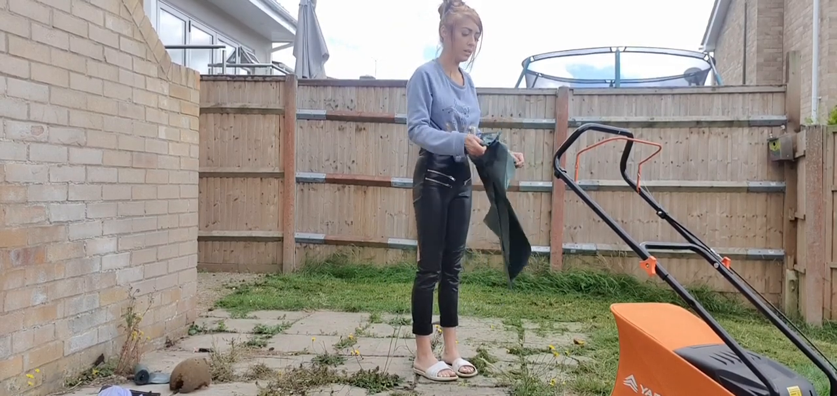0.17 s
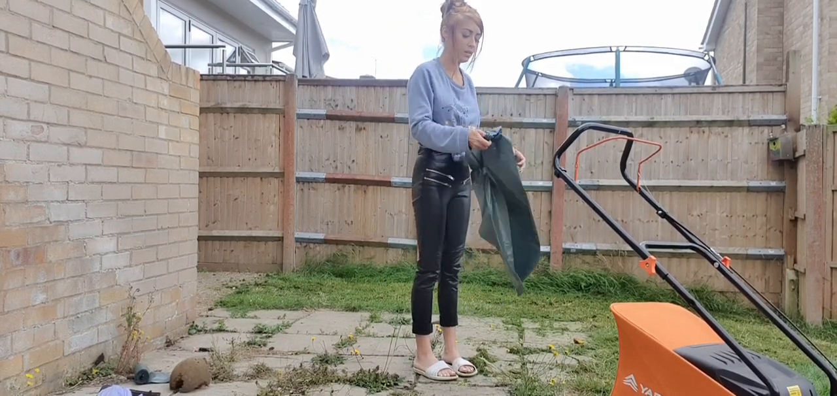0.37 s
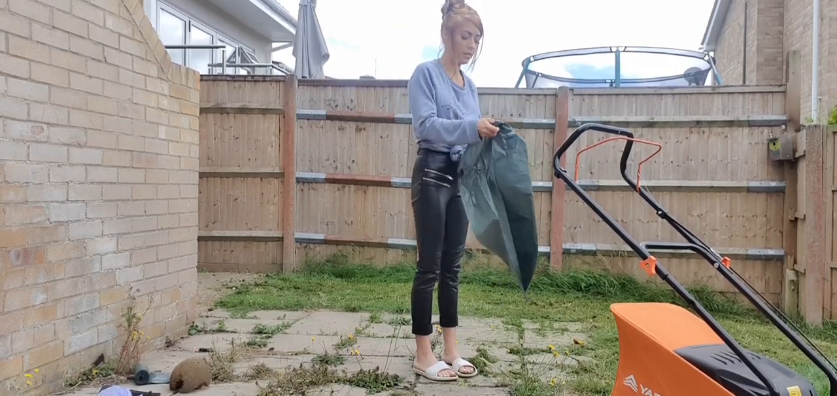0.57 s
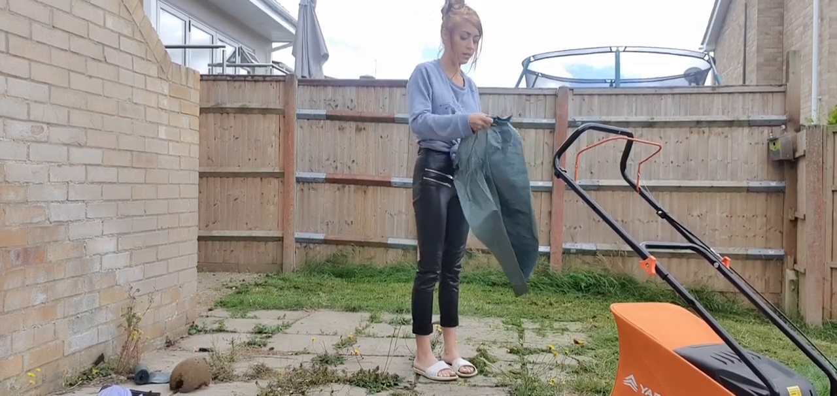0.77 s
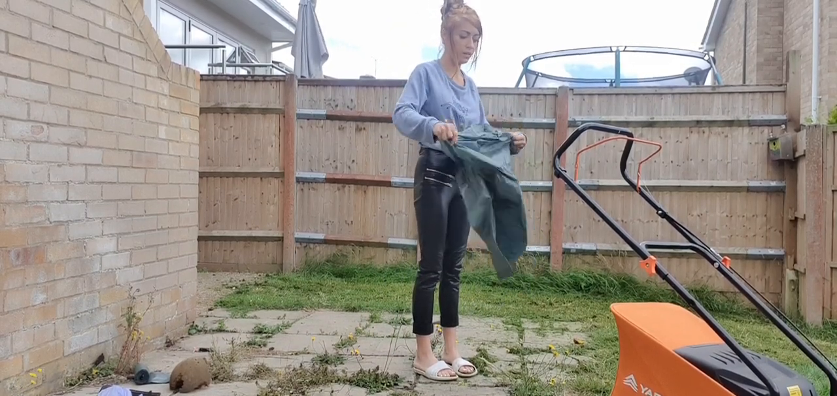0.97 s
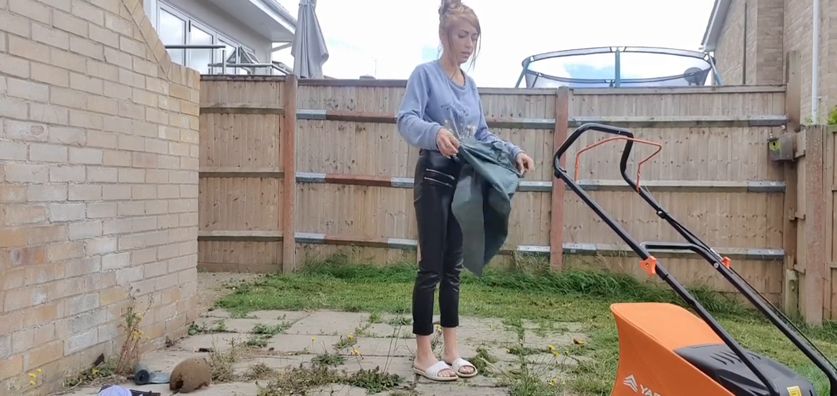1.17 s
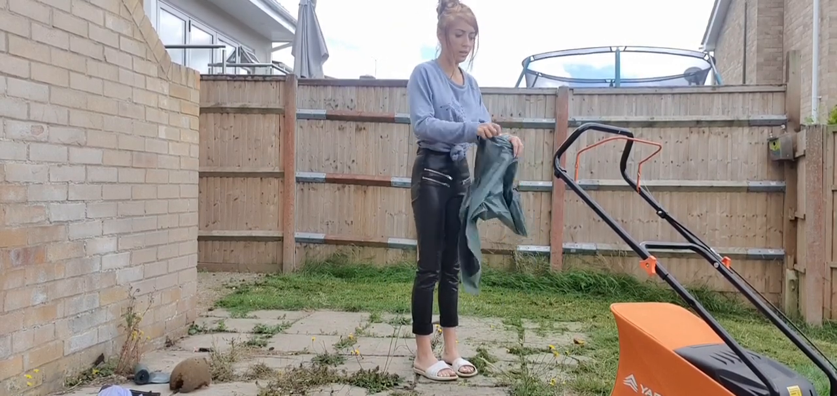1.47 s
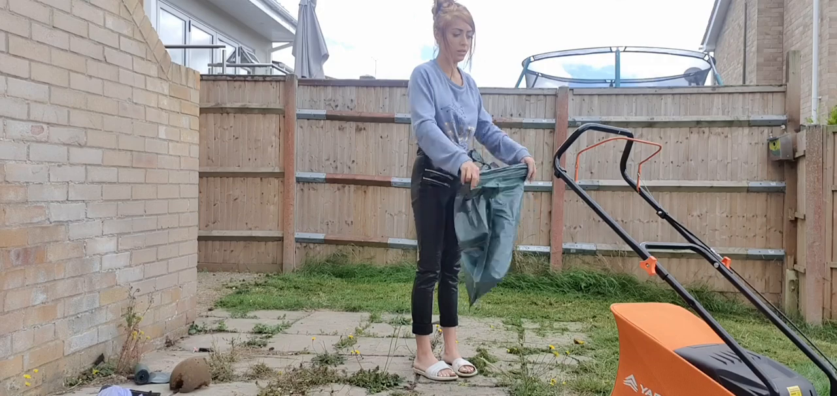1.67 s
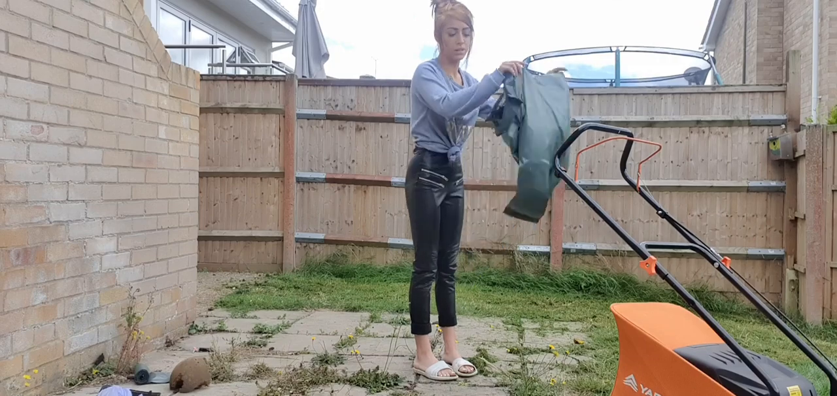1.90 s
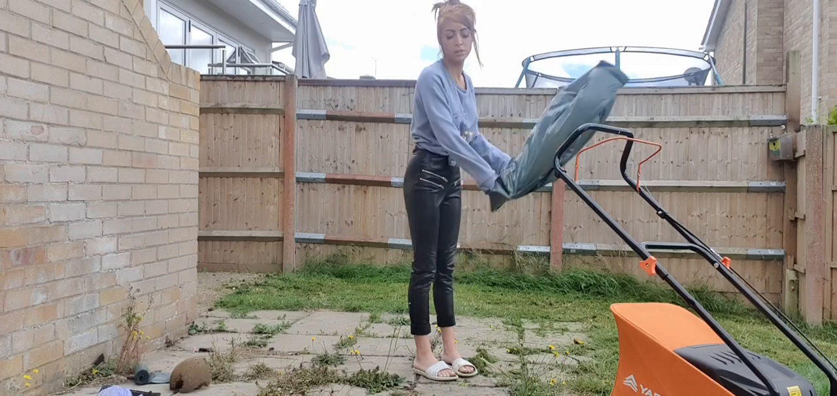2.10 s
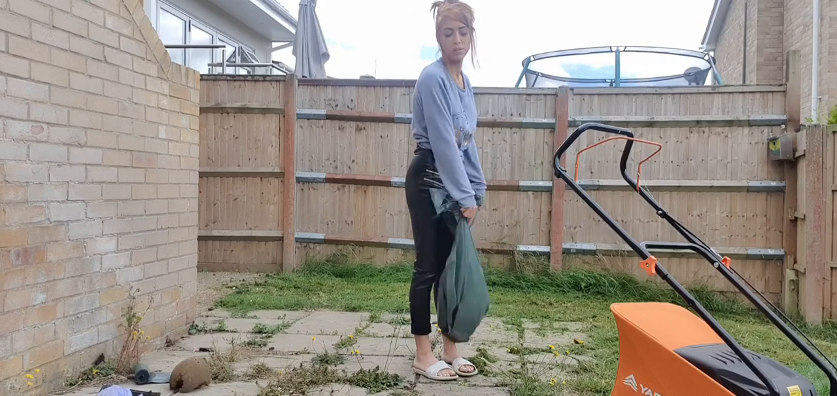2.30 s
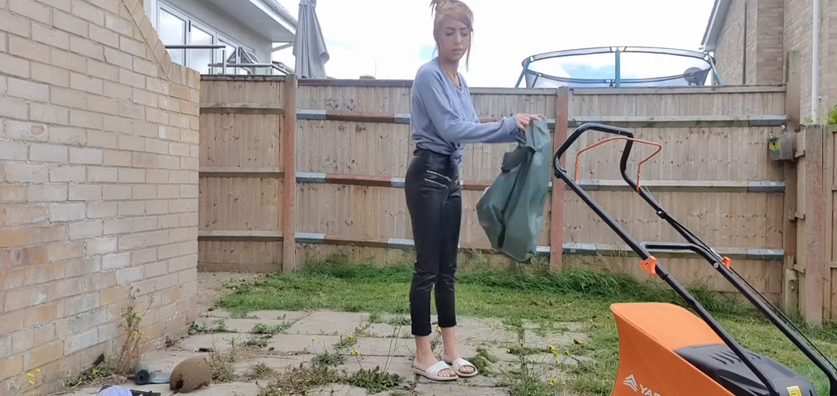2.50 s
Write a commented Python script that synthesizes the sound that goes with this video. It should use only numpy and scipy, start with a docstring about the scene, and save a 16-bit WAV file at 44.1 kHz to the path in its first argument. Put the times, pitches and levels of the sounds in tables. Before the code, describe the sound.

A stiff fabric bag rustles faintly with small crinkly clicks from 0 s, strongest near 0.1 s, then nearly stops around 0.7 s. A fuller rustle with a sharp fold flick comes near 1.05 s. Steadier brushing runs from 1.5 to 2.1 s, swelling into a loud, hollow snap at 2.19 s. Coarse rustling and dull flaps follow, with a flick at 2.5 s, fading. Short yard echoes, faint low outdoor rumble.

```python
"""A stiff fabric grass bag is picked open by hand in a small walled yard, unfolded, swung up and shaken out.
Sliding weave rustles as noise and its creases buckle in tiny clicks, with whisks and folds flicking over;
loose panels flap in dull slaps. At about 2.19 s the cloth pulls taut in one loud snap, then settles.
Throughout, brick wall and fence return quick echoes and a scattered tail over a faint outdoor rumble.
"""
import sys
import numpy as np
from scipy import signal
from scipy.fft import rfft, irfft, next_fast_len
from scipy.io import wavfile
from scipy.ndimage import uniform_filter1d

SR = 44100
rng = np.random.default_rng(int(sys.argv[2]) if len(sys.argv) > 2 else 0)


def inscribe(sig):
    """Save sig as 16-bit PCM at rate SR to the path in sys.argv[1].

    A 1-D sig is mono; a 2-D sig holds one channel per row.
    Samples are clipped to [-1, 1] before scaling.
    """
    pcm = np.round(np.clip(np.atleast_2d(sig).T, -1, 1) * 32767)
    wavfile.write(sys.argv[1], SR, pcm.astype(np.int16))


N = 116865  # samples, 2.65 s
T = np.arange(N) / SR  # s
SIZE = next_fast_len(N + SR)  # transform length with room for filter tails
HZ = np.maximum(np.arange(SIZE // 2 + 1) * SR / SIZE, 1)


def undb(db):
    """Decibels are logarithmic: 20 dB is a tenfold gain in amplitude."""
    return 10 ** (np.asarray(db) / 20)


def unit(x):
    """Normalisation: scale to an rms of 1."""
    return x / np.sqrt(np.mean(x ** 2))


def curve(rows, t):
    """Linear interpolation in time through (s, value) rows."""
    return np.interp(t, *np.array(rows).T)


def across(points):
    """Linear interpolation through (Hz, value) points on a logarithmic frequency axis."""
    hz, value = np.array(points).T
    return np.interp(np.log(HZ), np.log(hz), value)


def shape(x, db):
    """Minimum-phase filtering: a folded cepstrum gives a causal filter; white input keeps its level."""
    gain = undb(db)
    cepstrum = irfft(np.log(gain / np.sqrt(np.mean(gain ** 2))), SIZE)
    cepstrum[1:SIZE // 2] *= 2
    cepstrum[SIZE // 2 + 1:] = 0
    response = np.exp(rfft(cepstrum))
    return irfft(rfft(x, SIZE) * response, SIZE)[..., :N]


def walk(rate):
    """Smoothed random modulation: about `rate` new values per second, rms 1."""
    hold = int(SR / rate)
    steps = rng.standard_normal(N)[:N // hold + 1]
    return unit(uniform_filter1d(np.repeat(steps, hold), hold))[:N]


def clicks(per_s, spread_db):
    """Random impulse train, rms 1: positive spread makes a few clicks strong, negative a few weak."""
    size = undb(spread_db * np.minimum(rng.exponential(size=N), 5))
    struck = rng.random(N) < per_s / SR
    return unit(struck * size * rng.choice([-1, 1], N))


def swell(at, rise, fall):
    """Exponential envelope: growth to a peak of 1, then decay (all times in seconds)."""
    return np.exp(-np.maximum((at - T) / rise, (T - at) / fall))


# Rubbing effort of the hands, one curve per movement. Each row: time in seconds, level in dB.
PICK_OPEN_EFFORT = [(0.0, -51), (0.124, -36.5), (0.166, -47.5), (0.28, -50.5), (0.312, -67), (0.356, -54),
                    (0.502, -60), (0.506, -54), (0.608, -50.5), (0.658, -61), (0.7, -65)]
UNFOLD_EFFORT = [(0.73, -52), (0.738, -50), (0.814, -57), (0.858, -46.5), (0.942, -44.5), (0.948, -38),
                 (1.074, -35), (1.164, -51), (1.25, -51), (1.274, -47), (1.308, -53.5), (1.35, -45.5),
                 (1.424, -54.5), (1.432, -59), (1.45, -61)]
LIFT_EFFORT = [(1.48, -45), (1.502, -62), (1.516, -42.5), (1.688, -38.5), (1.828, -44), (1.864, -36),
               (1.926, -40), (1.95, -37.5), (2.08, -45.5)]
SHAKE_EFFORT = [(2.1, -40), (2.178, -28)]
SETTLE_EFFORT = [(2.25, -30.5), (2.368, -35.5), (2.402, -30.5), (2.456, -37), (2.524, -37.5),
                 (2.598, -48.5), (2.606, -39.5), (2.638, -55), (2.65, -45)]
# Single folds that flick over. Each row: time in seconds, level in dB.
FOLD_FLICKS = [(.041, -42), (.118, -33), (0.507, -45), (0.859, -40), (.949, -35), (.956, -39),
               (1.0632, -27), (1.275, -43), (1.474, -40), (1.5135, -45), (1.6175, -35), (1.8417, -36.5),
               (2.129, -45), (2.513, -28), (2.6068, -40)]
# Relative spectrum of rubbing cloth. Each row: frequency in Hz, density in dB per Hz.
RUB_SPECTRUM = [(60, -18.5), (170, -3.5), (300, -7.5), (700, -4.5), (1100, -3.5), (2300, -1.5), (3600, 0),
                (5000, -1.5), (6200, -7), (7100, -18.5), (7900, -22.5), (9500, -16.5), (11300, -15.5),
                (15500, -20.5)]
# Changing sheen of the rubbing. Each row: time in seconds, level of the treble in dB.
SHEEN_LEVEL = [(0, 1), (.3, -0.5), (.7, -1), (.92, -2), (.97, -3.5), (1.1, 0), (1.2, 0), (1.5, 3), (1.8, 3),
               (1.98, -2), (2.07, -1), (2.3, -3.5), (2.42, -1.5), (2.65, -5.5)]
SHEEN_HZ = 6940  # the treble lies above this
SLIDE_DB, CRINKLE_DB = 1, -2.5  # shares of smooth sliding and buckling creases
CRINKLE_PER_S, CRINKLE_SPREAD_DB = 1400, 2.5
RUB_FLUTTER_DB = 1.27  # rms


def rustle():
    """Friction and buckling: sliding weave gives noise, creases give clicks, folds give click bursts."""
    movements = PICK_OPEN_EFFORT + UNFOLD_EFFORT + LIFT_EFFORT + SHAKE_EFFORT + SETTLE_EFFORT
    effort = undb(curve(movements, T) + RUB_FLUTTER_DB * walk(rate=110))
    slide = undb(SLIDE_DB) * rng.standard_normal(N)
    crinkle = undb(CRINKLE_DB) * clicks(CRINKLE_PER_S, CRINKLE_SPREAD_DB)
    flicks = sum(undb(db) * swell(at, rise=0.0004, fall=0.0042) for at, db in FOLD_FLICKS)
    folds = flicks * clicks(per_s=8500, spread_db=1.5)
    cloth = shape(effort * (slide + crinkle) + folds, across(RUB_SPECTRUM))
    treble = irfft(rfft(cloth, SIZE) / (1 + (SHEEN_HZ / HZ) ** 4), SIZE)[:N]
    return cloth + (undb(curve(SHEEN_LEVEL, T)) - 1) * treble


# The cloth pulls taut. Each row: peak time in seconds, rise in seconds, fall in seconds, level in dB.
TAUT_PULLS = [(2.1845, 0.0037, 0.0052, -18.5), (2.1939, .002, .0022, -7), (2.204, 0.0026, 0.016, -24.5)]
# Relative spectrum of the snap. Each row: frequency in Hz, density in dB per Hz.
SNAP_SPECTRUM = [(60, -7), (170, -17), (500, -2.5), (1000, 0), (2000, 3), (2800, -5), (3800, -0.5),
                 (5000, -8.5), (6200, -11.5), (7700, -25.5), (10000, -21), (15500, -40)]


def snap():
    """Impulsive release: creases pull straight almost together, as a dense burst of clicks."""
    tension = sum(undb(db) * swell(at, rise, fall) for at, rise, fall, db in TAUT_PULLS)
    return shape(tension * clicks(per_s=15000, spread_db=1), across(SNAP_SPECTRUM) + hollow())


# Loose panels that billow. Each row: fullest moment in seconds, rise in seconds, fall in seconds, level in dB.
PANEL_BILLOWS = [(.072, .008, 0.011, -52), (.135, 0.017, 0.017, -48), (1.05, 0.064, 0.027, -51),
                 (1.544, 0.013, 0.029, -45), (1.65, 0.031, 0.053, -49), (1.88, .03, 0.16, -48.5),
                 (2.133, .006, 0.021, -30), (2.195, .005, 0.021, -32), (2.28, 0.028, 0.025, -30.5),
                 (2.41, 0.025, 0.047, -33)]
# Relative spectrum of the slaps. Each row: frequency in Hz, density in dB per Hz.
FLAP_SPECTRUM = [(30, -11), (90, -1), (170, -2), (400, 0), (700, -1.5), (1200, -2.5), (2200, -15),
                 (6000, -48), (15000, -70)]
FLAP_FLUTTER_DB = 2.5  # rms


def flaps():
    """Air displacement: loose panels billow, their ripples slapping softly and dully."""
    power = sum((undb(db) * swell(at, rise, fall)) ** 2 for at, rise, fall, db in PANEL_BILLOWS)
    flutter = undb(FLAP_FLUTTER_DB * walk(rate=140))
    ripples = unit(clicks(per_s=1500, spread_db=-2.0) * flutter)
    return shape(np.sqrt(power) * ripples, across(FLAP_SPECTRUM) + hollow())


# Hollow resonances of flaps and snap. Each row: frequency in Hz, width in Hz, lift in dB.
HOLLOW_MODES = [(174, 39, 9.5), (295.7, 49, 5.5), (392, 15, 5), (606, 23, 3.5), (700, 46, 3), (1314, 19, 4),
                (1640, 52, 0.5), (3400, 36, -2), (3600, 40, 10.5)]


def hollow():
    """Resonance: each mode lifts a narrow bell of the spectrum, in dB."""
    return sum(db / (1 + (2 * (HZ - hz) / width) ** 2) for hz, width, db in HOLLOW_MODES)


# Knocks of the slack cloth. Each row: start in seconds, pitch in Hz, decay in seconds, level in dB.
CLOTH_THUMPS = [(.068, 700, .01, -44), (1.535, 546, 0.019, -38.5), (2.188, 183, 0.019, -23.5)]


def thumps():
    """Damped oscillation: the slack cloth knocks and shoves air, each knock a decaying sine."""
    out = 0
    for at, hz, decay, db in CLOTH_THUMPS:
        age = np.maximum(T - at, 0)
        out = out + undb(db) * np.sin(2 * np.pi * hz * age) * np.exp(-age / decay)
    return out


# Whisks of slipping weave. Each row: peak time in seconds, rise in seconds, fall in seconds, level in dB.
WEAVE_SLIPS = [(.853, .001, .02, -60), (1.414, .002, 0.011, -53.5), (2.19, 0.0049, .02, -36.5),
               (2.607, .001, .01, -49)]
# Relative spectrum of the whisks. Each row: frequency in Hz, density in dB per Hz.
WHISK_SPECTRUM = [(100, -50), (3000, -16), (7800, -8), (10000, -1), (12500, -2), (15500, -4)]


def whisks():
    """Brief friction: the weave slips in thin, bright hisses of dense clicks."""
    slip = sum(undb(db) * swell(at, rise, fall) for at, rise, fall, db in WEAVE_SLIPS)
    return shape(slip * clicks(per_s=6200, spread_db=-1.0), across(WHISK_SPECTRUM))


SHIFTS_PER_S = 45  # how often the sounding spot on the bag shifts


def yard(x, count=6):
    """Superposition: direct sound plus echoes that change as different spots on the bag sound."""
    shares = np.array([walk(SHIFTS_PER_S) for _ in range(count)])
    shares /= np.linalg.norm(shares, axis=0)  # the spots' powers add up to 1
    ahead, aside = sum(paths(x * share) for share in shares)
    return undb(-1.5) * np.array([x + ahead, aside])


# Reflections from near surfaces. Each row: mean delay in seconds, gain in dB relative to the direct sound.
NEAR_ECHOES = [(.0052, -15), (0.0105, -11), (0.0184, -16), (0.028, -18.5)]
YARD_DB = -3.5  # each tail's energy relative to the direct sound


def paths(x):
    """Reflection from one spot on the bag: sound returned from ahead and from the side."""
    ahead = undb(YARD_DB) * scatter()
    aside = undb(YARD_DB) * scatter()
    for delay, db in NEAR_ECHOES:
        ahead[int(delay * SR * rng.uniform(.9, 1.1))] += undb(db)
    wall = rng.standard_normal(len(aside)) * np.exp(-T[:len(aside)] / 0.0041)
    aside += undb(-0.2) * wall / np.linalg.norm(wall)
    return np.array([signal.fftconvolve(x, h)[:N] for h in (ahead, aside)])


YARD_T60_S, YARD_BUILD_S = 0.23, 0.0062  # time to fall 60 dB, build-up time constant


def scatter():
    """Diffuse reverberation: a short, dense noise tail from bricks and boards, of energy 1."""
    t = T[:SR // 2]
    decay = undb(-60 * t / YARD_T60_S)
    tail = rng.standard_normal(len(t)) * decay * (1 - np.exp(-t / YARD_BUILD_S))
    return tail / np.linalg.norm(tail)


# Relative spectrum of the outdoor air. Each row: frequency in Hz, density in dB per Hz.
OUTDOOR_SPECTRUM = [(20, -16.5), (32, -9), (43, 7), (52, -5.5), (62, -3.5), (76, -10.5), (100, -6),
                    (135, -16), (185, -16.5), (260, -24.5), (400, -24.5), (700, -22), (1500, -29),
                    (4000, -37.5), (8000, -52), (15500, -53)]
# Swelling of the rumble. Each row: time in seconds, level of the bass in dB.
RUMBLE_LEVEL = [(0, -0.5), (.2, 2), (.7, -3.5), (1.08, 5), (1.3, -0.5), (1.6, 1.5), (2.65, -0.5)]
OUTDOORS_DB, RUMBLE_HZ = -48.5, 140  # level before swelling; the bass lies below this


def outdoors():
    """Broadband ambience: faint shaped noise of the neighbourhood whose bass slowly swells."""
    air = shape(rng.standard_normal((2, N)), across(OUTDOOR_SPECTRUM)) * undb(OUTDOORS_DB)
    bass = irfft(rfft(air, SIZE) / (1 + (HZ / RUMBLE_HZ) ** 4), SIZE)[:, :N]
    return air + (undb(curve(RUMBLE_LEVEL, T)) - 1) * bass


# Likeness of the two ports. Each row: frequency in Hz, likeness (limited to 0-1 in use).
PORT_LIKENESS = [(50, 1.26), (300, 0.9), (700, .68), (1150, 0), (2400, 0.63), (4200, 0.33), (6500, 0.4),
                 (7500, 0.55), (10000, 1), (12500, 0.6), (15500, 0.2)]
# Phase between the ports. Each row: frequency in Hz, left lead in radians.
LEFT_LEAD = [(900, 0.11), (1800, 1.58), (3500, 0.38), (5000, 2.33), (6400, 1.2), (7200, 0)]
# Level between the ports. Each row: frequency in Hz, left minus right in dB.
LEFT_BALANCE = [(300, 0.5), (900, 0.5), (2800, 0.5), (4600, -2.5), (6800, -1), (8200, 2), (11500, 0),
                (13300, 8), (15500, 7)]


def microphones(mid, side):
    """Coherence: two spaced ports hear alike in the bass and less so through much of the treble."""
    like = np.clip(across(PORT_LIKENESS), 0, 1)
    sign = np.array([[1], [-1]])  # left, right
    shared = rfft(mid, SIZE) * np.sqrt((1 + like) / 2)
    opposed = rfft(side, SIZE) * np.sqrt((1 - like) / 2)
    level = undb(sign * across(LEFT_BALANCE) / 2)
    phase = np.exp(1j * sign * across(LEFT_LEAD) / 2)
    return irfft((shared + sign * opposed) * level * phase, SIZE)[:, :N]


def scene():
    """Superposition: the bag in the yard, over the outdoor rumble, at two ports."""
    bag = rustle() + whisks() + flaps() + snap()
    mid, side = yard(bag) + outdoors()
    return microphones(mid + thumps(), side)  # the thumps come without echoes


TOP_HZ = 15750


def record(dry):
    """Band limiting: the recorder's steep low-pass filter removes the top of the spectrum."""
    low_pass = signal.ellip(14, .2, 70, TOP_HZ, fs=SR, output="sos")  # .2 dB ripple, 70 dB stopband
    return signal.sosfilt(low_pass, dry)


dry = scene()
out = record(dry)
inscribe(out)
```